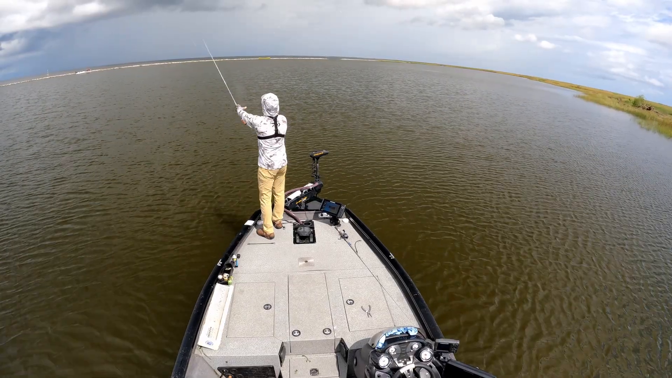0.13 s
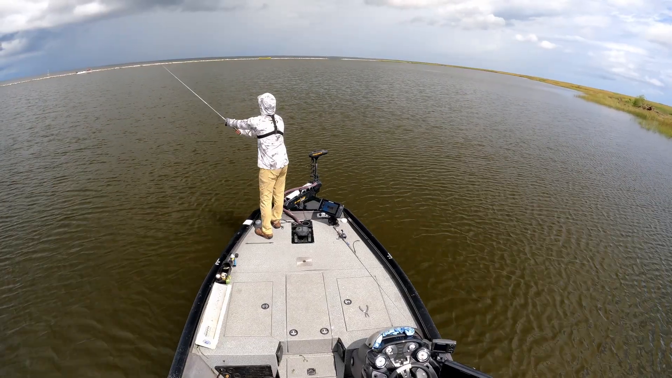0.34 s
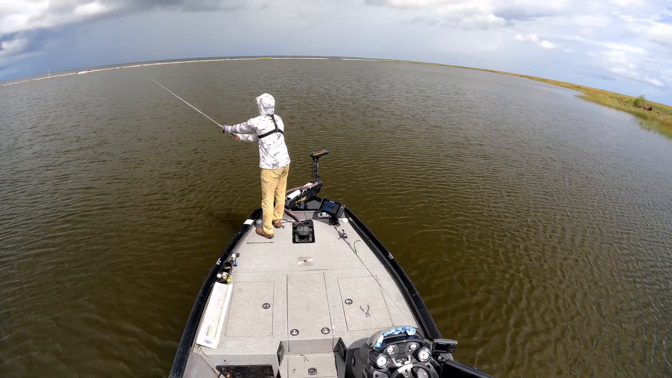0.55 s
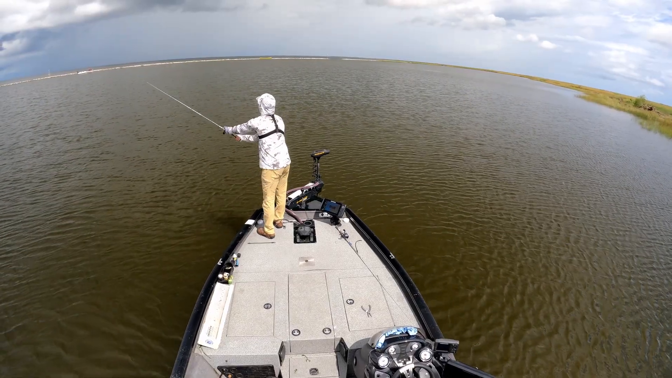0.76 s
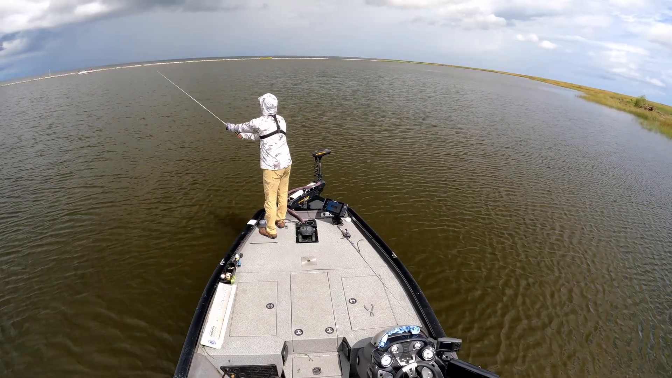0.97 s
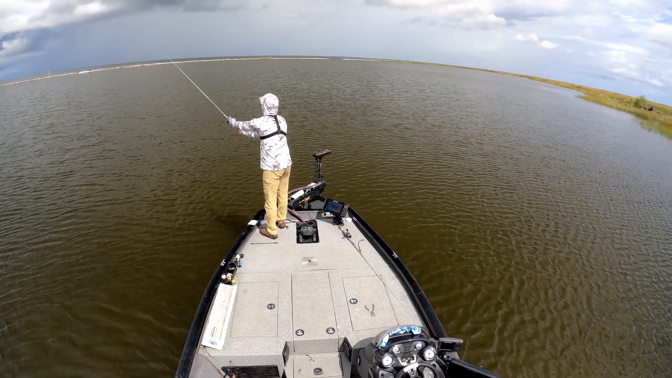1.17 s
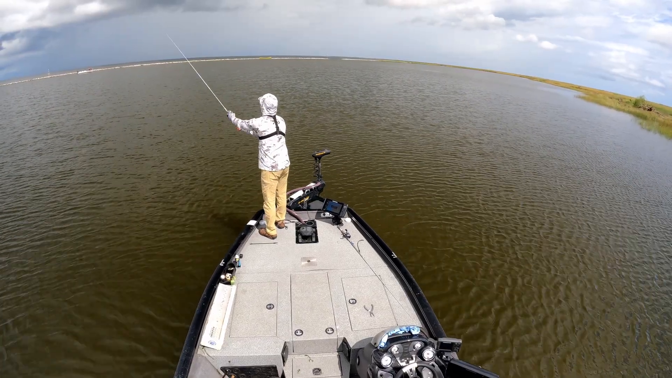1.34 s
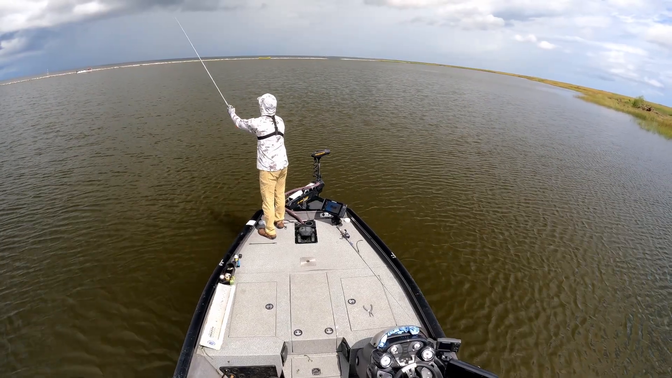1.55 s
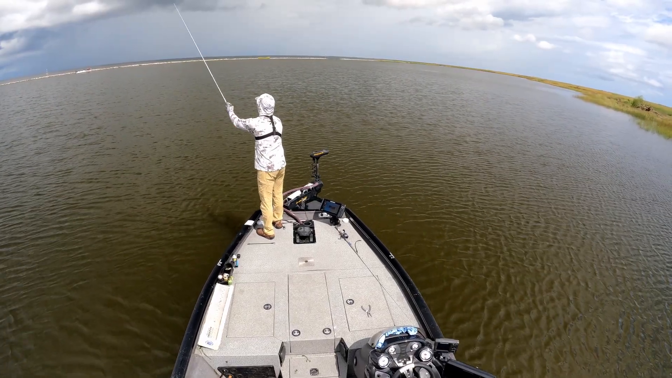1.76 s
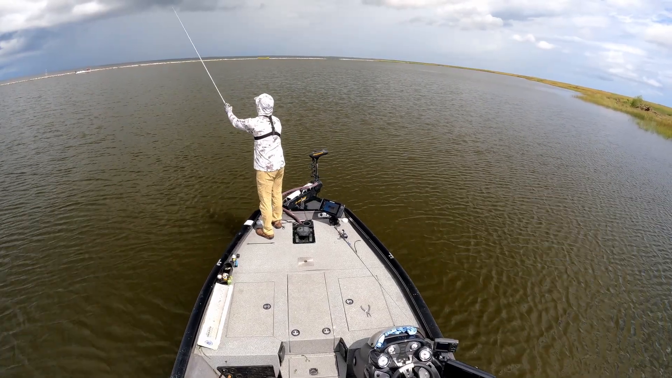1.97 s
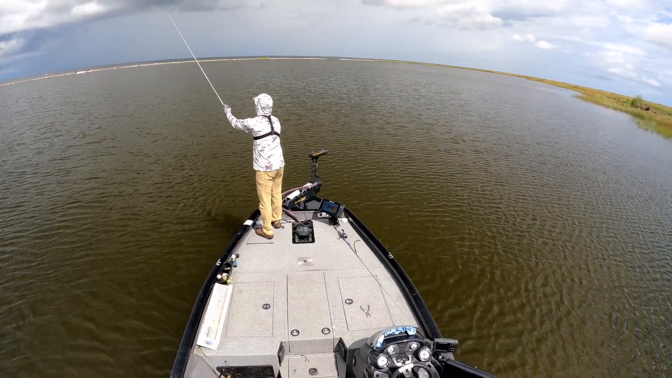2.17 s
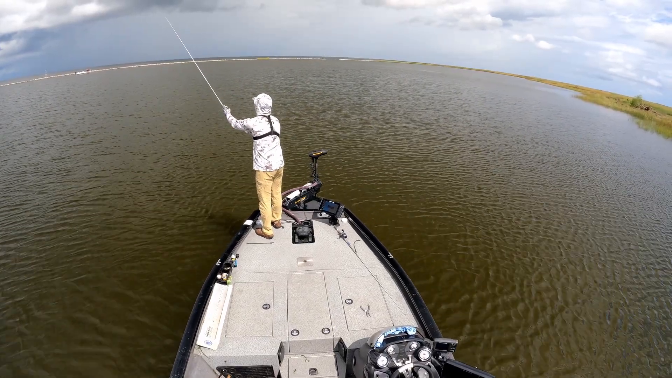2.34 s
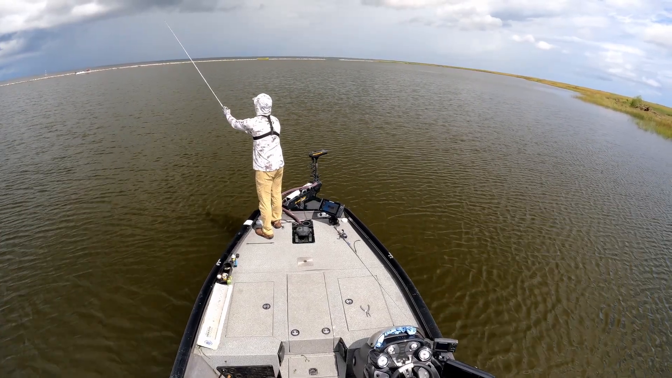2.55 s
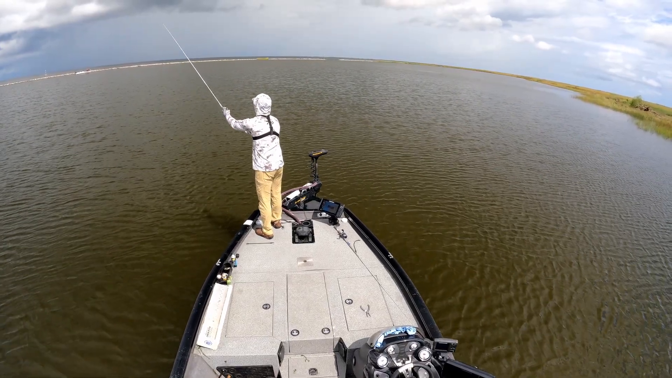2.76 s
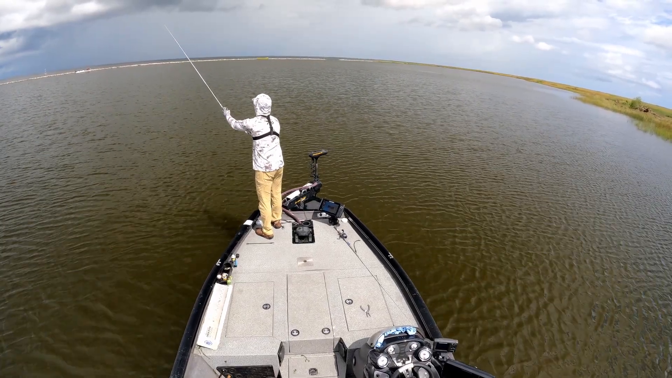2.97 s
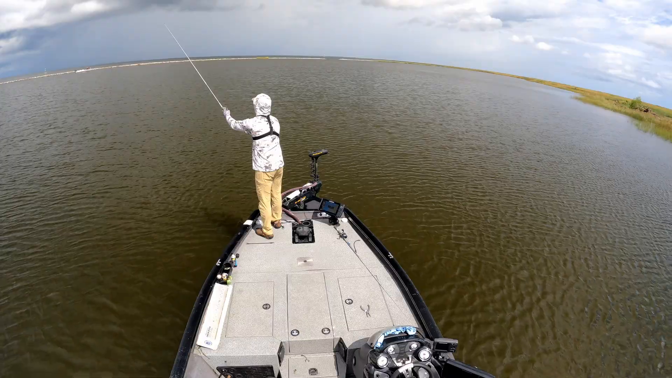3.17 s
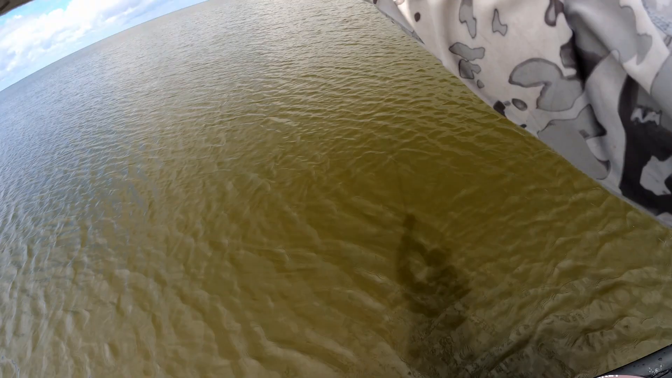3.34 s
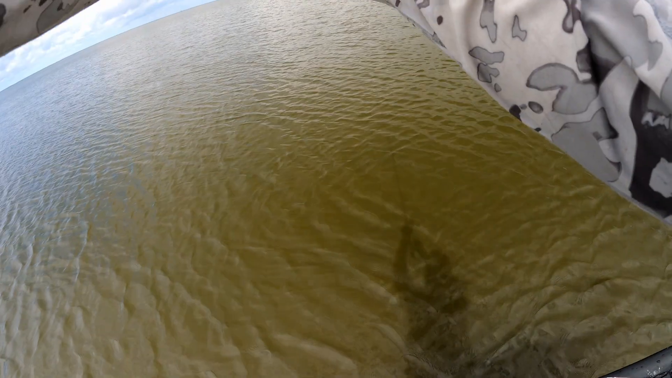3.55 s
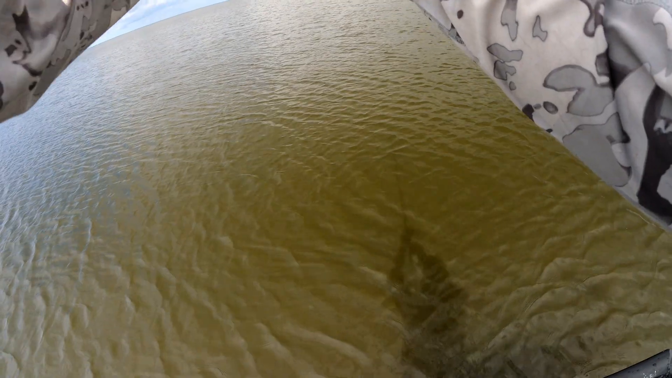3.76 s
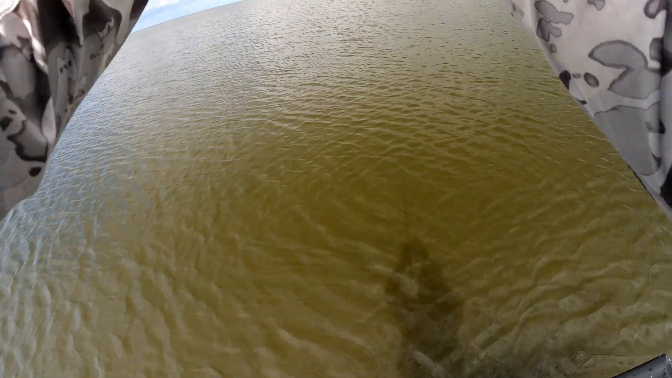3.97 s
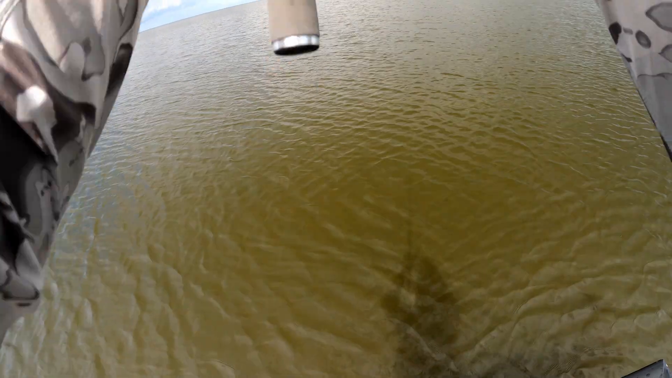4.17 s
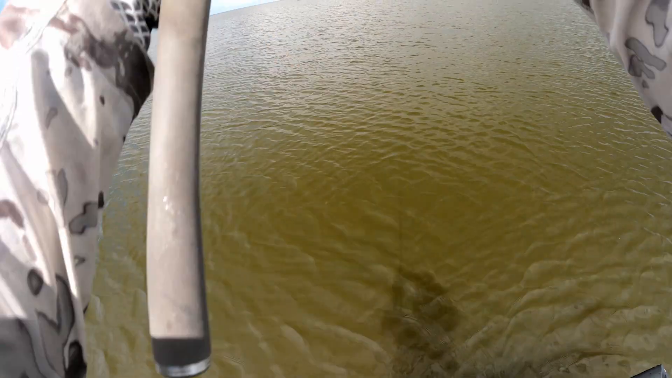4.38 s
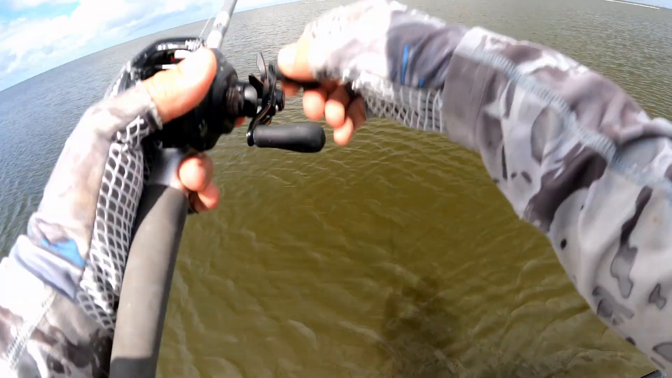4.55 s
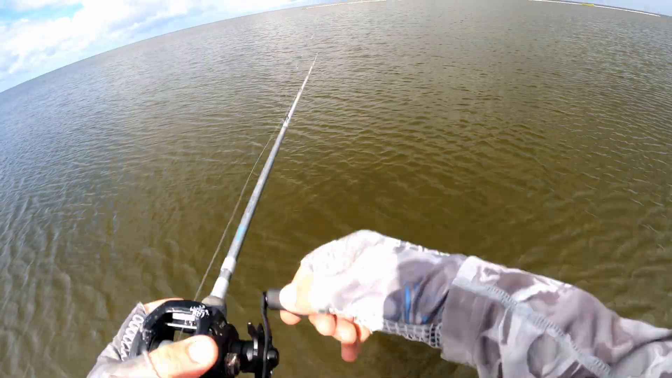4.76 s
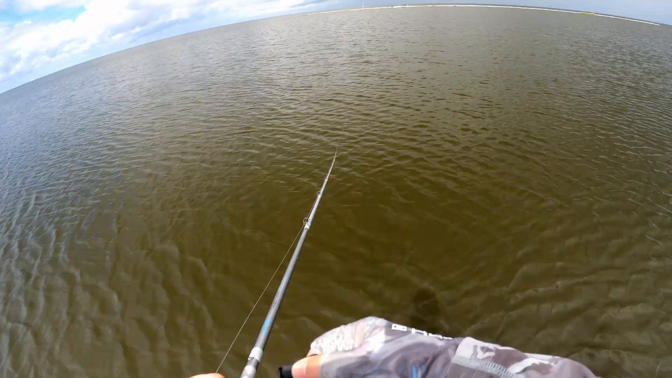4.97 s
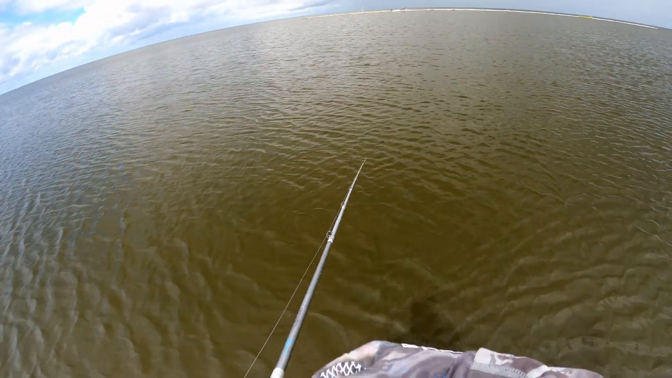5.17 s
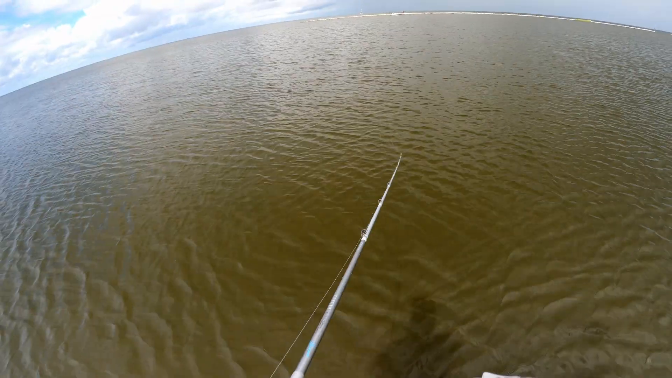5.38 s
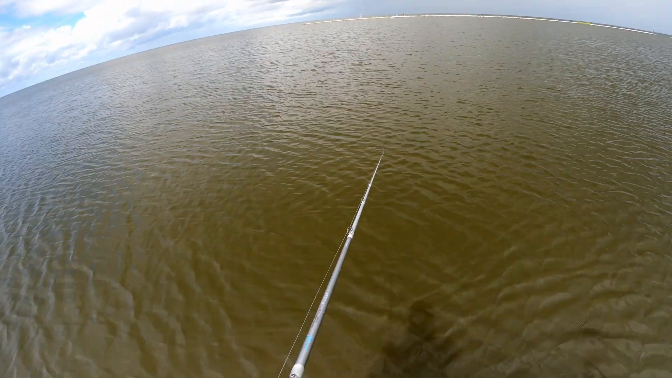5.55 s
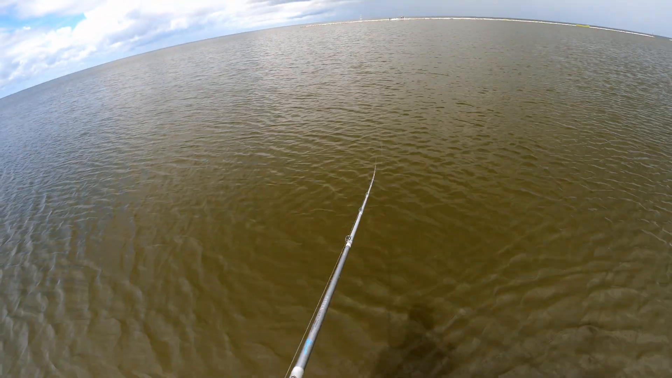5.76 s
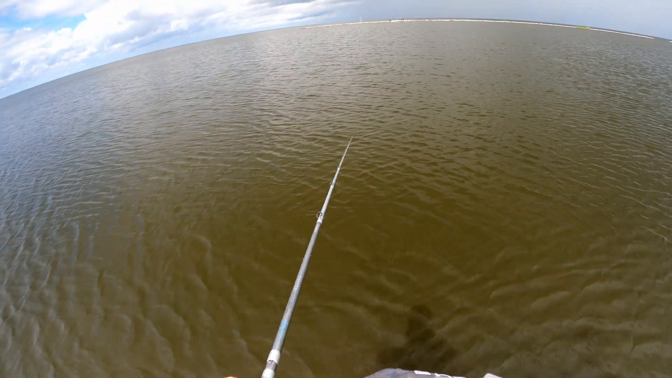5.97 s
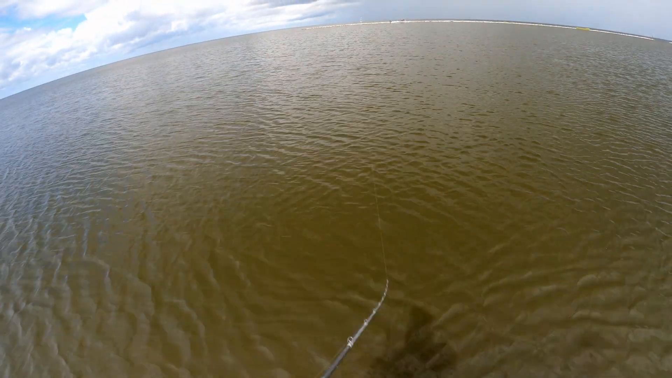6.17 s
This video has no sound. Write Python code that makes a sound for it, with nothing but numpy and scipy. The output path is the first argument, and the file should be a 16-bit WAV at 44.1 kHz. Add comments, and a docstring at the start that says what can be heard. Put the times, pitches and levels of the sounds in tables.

```python
"""A fishing reel's spool spins up on a cast, then whirs down on its bearings as line hisses out.
Heard from the angler's chest in the bow of a boat: the clutch clicks free and the rod swishes through
the air. After the run the thumb creaks on the spool, the clutch snaps in, and a few turns of the handle
make the gears purr and tick. Sleeves rustle, and wind buffets the microphone over lapping water and
the low hum of the boat."""
import sys
import numpy as np
from scipy import signal
from scipy.fft import rfft, irfft, next_fast_len
from scipy.io import wavfile
from scipy.ndimage import uniform_filter1d, map_coordinates

SR = 44100
rng = np.random.default_rng(int(sys.argv[2]) if len(sys.argv) > 2 else 0)


def put_to_file(sound):
    """Save the sound as 16-bit audio at rate SR, in the file named by the first command-line argument."""
    columns = np.atleast_2d(sound).T  # one column per channel
    safe = np.clip(columns, -1, 1)
    whole_steps = np.round(safe * 32767)
    wavfile.write(sys.argv[1], SR, whole_steps.astype(np.int16))


N = 274294
TIME = np.arange(N) / SR


def undb(db):
    """Decibels to gain."""
    return 10 ** (np.asarray(db) / 20)


def unit(x):
    """Scale to rms 1."""
    return x / np.sqrt(np.mean(x ** 2))


def curve(table):
    """An automation line through (seconds, value) points."""
    return np.interp(TIME, *np.transpose(table))


def colour(x, points):
    """EQ by a curve of (Hz, dB) points."""
    hz, db = np.transpose(points)
    size = next_fast_len(len(x))
    bins_hz = np.maximum(np.fft.rfftfreq(size, 1 / SR), 1)
    gain = undb(np.interp(np.log(bins_hz), np.log(hz), db))
    return irfft(rfft(x, size) * gain, size)[:len(x)]


def noise(points):
    """Coloured noise of rms 1."""
    return unit(colour(rng.standard_normal(N), points))


def walk(rate_hz):
    """Smooth random drift of rms 1."""
    knots = rng.standard_normal(N // 10)
    return unit(map_coordinates(knots, [TIME * rate_hz], order=2, mode="wrap"))


def wavering(hz, width_hz, rough):
    """A partial whose size and phase are shaken at about width_hz."""
    phase = 2 * np.pi * np.cumsum(hz) / SR + rng.uniform(0, 2 * np.pi)
    shake = rng.standard_normal((2, N // 20))
    a, b = (np.interp(TIME * width_hz, np.arange(N // 20), row) for row in shake)
    return unit((1 + rough * a) * np.sin(phase) + rough * b * np.cos(phase))


def resonate(x, hz, width_hz):
    """A resonance applied twice, for steep skirts."""
    b, a = signal.iirpeak(hz, hz / width_hz, fs=SR)
    return signal.lfilter(b, a, signal.lfilter(b, a, x))


def grains(rate_hz, spread_db):
    """Sparse random impulses of uneven size."""
    impulses = (rng.random(N) < rate_hz / SR) * rng.standard_normal(N)
    return impulses * undb(spread_db * np.minimum(rng.exponential(size=N), 4))


def swell(s, db, rise_s, fall_s, hold_s=0):
    """Gain that reaches db at time s, holds, and falls; rise and fall are the times for 20 dB."""
    before, after = np.maximum(s - TIME, 0), np.maximum(TIME - s - hold_s, 0)
    return undb(db - 20 * (before / rise_s + after / fall_s))


def swells(table):
    """Joint gain of several swells."""
    return np.sqrt(sum(swell(*row) ** 2 for row in table))


def decay(t, t60):
    """A tail that drops 60 dB in t60 seconds."""
    return np.exp(-np.log(1000) * t / t60)


def add(out, s, x):
    """Mix x into out from time s."""
    i = max(int(s * SR), 0)
    out[i:i + len(x)] += x[:N - i]


# Tone of water and open air. Each row: frequency in Hz, EQ gain in dB.
WATER_EQ = [(30, 1.5), (70, -13), (120, 4), (190, -7), (260, -9.5), (450, -19.5), (800, -17), (1300, -23),
            (2400, -28), (4000, -27.5), (9000, -32), (16000, -30)]


def water():
    """Lapping water and open air make a soft, barely moving bed."""
    return noise(WATER_EQ) * undb(-59 + .55 * walk(4))


# The boat's drone. Each row: pitch in Hz, level in dB.
HUM_PARTIALS = [(85.5, -53.5), (103.5, -58.5), (163.5, -59), (205, -68.5), (287, -79), (327, -69.5)]
# Its two slow swells. Each row: peak time in seconds, gain in dB, rise and fall in seconds.
HUM_RIDES = [(1.8, 0.5, 7.7, 4.2), (4.55, 1, 3.3, 1.6)]


def boat_hum():
    """The boat hums on a few low, slightly unsteady partials."""
    hum = sum(undb(db) * wavering(np.full(N, hz), width_hz=6, rough=.2) for hz, db in HUM_PARTIALS)
    return hum * swells(HUM_RIDES)


# Air thumps as the body swings. Each row: start in seconds, level in dB, rise and fall in seconds.
AIR_THUMPS = [(.07, -7, 0.0014, 0.013), (.28, -13.5, 0.024, 0.045)]


def buffets():
    """Each buffet is one quick push of air that ebbs away."""
    out, t = np.zeros(N), TIME[:SR // 2]
    for s, db, rise_s, fall_s in AIR_THUMPS:
        push = (1 - np.exp(-(t / rise_s) ** 2)) * np.exp(-t / fall_s)
        add(out, s, undb(db) * push / push.max())
    return out


# Rumble of the breeze and of the gusts. Each row: frequency in Hz, EQ gain in dB.
BREEZE_EQ = [(4, -12), (9, 3.5), (16, -13), (28, -20.5), (50, -26), (100, -36), (200, -48), (500, -52.5),
             (2000, -120)]
GUST_EQ = [(4, -16.5), (9, 2.5), (16, -11.5), (28, -28.5), (50, -27), (100, -47), (300, -83), (2000, -130)]
# Air driven by the swing, and slow gusts.
# Each row: peak time in seconds, level in dB, rise and fall in seconds.
SWING_BLASTS = [(.078, -4.5, 0.076, 0.11), (.33, -24, 0.35, 0.32)]
SLOW_GUSTS = [(1.08, -30, .25, 0.39), (1.62, -34, 0.55, 0.37), (2.48, -35.5, 0.66, 0.25),
              (3.24, -31, 0.16, .2), (3.46, -29.5, 0.28, 0.3), (4.53, -29.5, 0.46, 0.52),
              (5.8, -43, 0.99, 1.3)]


def wind(breeze_db=-42.5, ceiling=.6):
    """Moving air pushes on the microphone; the hardest buffets flatten out."""
    breeze, gusts = noise(BREEZE_EQ), noise(GUST_EQ)
    breeze /= np.sqrt(uniform_filter1d(breeze ** 2, SR // 4))  # even out the level
    breeze *= np.hypot(undb(breeze_db), swells(SWING_BLASTS))
    air = breeze + gusts * swells(SLOW_GUSTS) + buffets()
    return ceiling * np.tanh(air / ceiling)


# A low thump on the swing, then a small tap and soft plops, perhaps the lure landing far off.
# Each row: start in seconds, pitch in Hz, level in dB, t60 in seconds.
THUMP_AND_PLOPS = [(.071, 68, -15, 0.1), (3.488, 1195, -34, 0.016), (3.544, 477, -51, 0.073),
                   (3.554, 434, -47, 0.056)]


def thump_and_plops():
    """Each thump, tap or plop is a close cluster of quickly damped tones."""
    out, t = np.zeros(N), TIME[:SR // 8]
    for s, hz, db, t60 in THUMP_AND_PLOPS:
        phase = 2 * np.pi * hz * t
        ring = np.sin(phase) - .27 * np.sin(1.34 * phase) + .64 * np.sin(.88 * phase)
        attack = 1 - np.exp(-t / .0009)
        add(out, s, undb(db) * ring * attack * decay(t, t60))
    return out


# Tone of the cloth. Each row: frequency in Hz, EQ gain in dB.
CLOTH_EQ = [(71, -31), (120, 2), (167, -7), (436, -8), (643, -12), (839, -13), (968, -18), (2240, -18),
            (3110, -24), (7200, -24.5), (16000, -34.5)]
# Rubs as the rod is lowered. Each row: peak time in seconds, level in dB, rise and fall in seconds.
CLOTH_RUBS = [(4.52, -49, 0.51, 0.27), (4.67, -46, 0.24, 0.3)]


def sleeves():
    """Cloth fibres catch and let go, in two rubs and a faint rustle as the angler shifts."""
    shift = swell(3.42, db=-62, rise_s=.12, fall_s=2.6, hold_s=2.1)
    folds = undb(1.4 * walk(45))
    fibres = unit(colour(grains(rate_hz=14000, spread_db=3.5), CLOTH_EQ))
    return fibres * np.hypot(swells(CLOTH_RUBS), shift) * folds


# Tone of the swish. Each row: frequency in Hz, EQ gain in dB.
SWISH_EQ = [(180, -43), (300, -9), (418, -13), (801, -1.5), (1030, -11), (1660, -5), (3030, -7),
            (3640, -13), (4370, -11), (8220, -11), (9710, -18), (14500, -12.5), (16000, -28)]
# Backswing, then forward whip. Each row: peak time in seconds, level in dB, rise and fall in seconds.
ROD_STROKES = [(.09, -40, 0.27, 0.28), (.155, -25, 0.052, 0.074)]


def rod_swish(split_hz=3300, treble_lag_s=.0058):
    """Air tears past the rod while line and sleeve crackle; the treble peaks late, at top tip speed."""
    crackle = unit(colour(grains(rate_hz=5000, spread_db=2.5), SWISH_EQ))
    air = unit(noise(SWISH_EQ) + 1.3 * crackle)
    low = signal.sosfiltfilt(signal.butter(2, split_hz, fs=SR, output="sos"), air)
    gain = swells(ROD_STROKES)
    return low * gain + (air - low) * np.interp(TIME - treble_lag_s, TIME, gain)


# Resonances the thumb shakes. Each row: frequency in Hz, width in Hz, relative level in dB.
CREAK_MODES = [(257, 150, 4), (356, 110, -2.5), (505, 54, -0.5), (753, 48, 4.5), (1090, 80, 0),
               (1602, 70, -7), (2180, 150, -11), (2903, 90, -2.5), (3800, 90, -16.5), (4760, 300, -20.5),
               (7500, 230, -18)]
# Presses on the spool. Each row: peak time in seconds, level in dB, rise and fall in seconds.
CREAK_SWELLS = [(4.026, -46, 0.004, 0.3), (4.2, -41, 0.052, 0.0301)]


def thumb(judder_hz=122, bend=.04, bend_start_s=4.09, bend_length_s=.053):
    """The wound line judders and squeaks under the thumb, a little higher as it tightens."""
    slip_count = np.floor(np.cumsum(judder_hz * (1 + .44 * walk(90))) / SR)
    slips = unit(np.diff(slip_count, prepend=0) * undb(1.1 * walk(81)))
    friction = slips + .39 * rng.standard_normal(N)
    creak = unit(sum(undb(db) * resonate(friction, hz, width) for hz, width, db in CREAK_MODES))
    pitch_ratio = 1 + bend * np.clip((TIME - bend_start_s) / bend_length_s, 0, 1)
    creak = map_coordinates(creak, [np.cumsum(pitch_ratio)], order=3, mode="mirror")
    return creak * swells(CREAK_SWELLS)


# The hand slows and pushes on twice a turn. Each row: time in seconds, gear mesh rate in Hz.
MESH_RATE = [(4.2, 815), (4.87, 768), (4.99, 785), (5.08, 886), (5.18, 791), (5.27, 895), (5.35, 792),
             (5.39, 855), (5.45, 776), (5.495, 925), (5.56, 816), (5.6, 834), (5.7, 750), (5.76, 720),
             (5.81, 850), (5.9, 820)]
# The purr. Each row: multiple of the mesh rate, relative level in dB.
GEAR_PARTIALS = [(1, -1), (2.5, -15), (4, -18.5), (5.4, -23.5)]
# Grit between the teeth. Each row: frequency in Hz, EQ gain in dB.
GRIT_EQ = [(200, -4.5), (700, 9), (1300, -0.5), (2100, -3), (2700, -2.5), (3400, -3), (4500, -15.5),
           (6000, -23), (16000, -27)]


def gears(load_db_per_s=3.5, full_load_s=5.34):
    """Rough, gritty teeth purr at a pitch that follows the hand, louder as the line tightens."""
    hz = curve(MESH_RATE)
    gain = swell(4.065, db=-57, rise_s=.058, fall_s=.26, hold_s=1.74)
    gain *= undb(load_db_per_s * np.minimum(TIME - full_load_s, 0))
    purr = np.zeros(N)
    for k, db in GEAR_PARTIALS:
        partial = wavering(k * hz, width_hz=110 * k, rough=1.3 * k)
        flicker = undb(min(k, 4) * walk(25))
        purr += undb(db) * unit(partial * flicker)
    grit = unit(colour(grains(rate_hz=3500, spread_db=3), GRIT_EQ)) * undb(2.5 * walk(30))
    return (undb(-1) * purr + undb(-5) * grit) * gain


def strike(modes, frame_db, treble_db):
    """One contact in the reel: its modes, a short crack, and the fainter ring of the rod."""
    t = TIME[:SR // 8]
    hz, db, t60 = np.transpose(modes)[:, :, None]
    hz = hz * (1 + .008 * rng.standard_normal(hz.shape))
    gain = undb(db + frame_db * (hz < 1500) + treble_db * (hz > 4000))
    gain *= undb(1.2 * rng.standard_normal(hz.shape))  # no two contacts land on the same spot
    ring = gain * np.sin(2 * np.pi * (hz * t + rng.random(hz.shape)))
    rod_db = -25 - 8 * (hz > 1500)  # the rod takes up mostly the low modes
    fade = decay(t, t60) + undb(rod_db) * decay(t, 6 * t60)
    crack_eq = [(150, frame_db - 16.5), (700, frame_db + 4), (3000, 6.8),
                (8000, treble_db - 6), (15000, treble_db - 6.5)]
    crack = colour(rng.standard_normal(len(t)), crack_eq)
    crack *= 1.34 * np.exp(-t / .001) + .11 * np.exp(-t / .0088)
    attack = 1 - np.exp(-t / .000097)
    hit = ((ring * fade).sum(axis=0) + crack) * attack * undb(-11)
    # so small a body radiates almost no bass
    return signal.sosfilt(signal.butter(3, 470, "highpass", fs=SR, output="sos"), hit)


def knocks(events, modes, chatter_db):
    """Parts of the reel knock home; they chatter lightly just before they seat."""
    out = np.zeros(N)
    for s, db, frame_db, treble_db in events:
        add(out, s, undb(db) * strike(modes, frame_db, treble_db))
        lead_s = rng.uniform(.00077, .0054)
        add(out, s - lead_s, undb(db + chatter_db) * strike(modes, frame_db, treble_db + 6))
    return out


# Handle ticks. Each row: start in seconds, then gain, frame boost and treble boost in dB.
HANDLE_TICKS = [(3.411, -49, -10, 0), (3.488, -45, -8, 3), (3.558, -45, -10, -2), (3.93, -43.5, -8, 5),
                (4.3245, -35.5, 4, 2), (4.327, -29, 2.5, -5), (4.3665, -17, -7, -3),
                (4.3691, -19, -0.5, -6), (4.486, -21, -6.5, -0.5), (4.724, -26, -4, -0.5),
                (4.9785, -29.5, 0.5, -4), (5.1192, -28, -8, 4), (5.1885, -37.5, 9, -4),
                (5.2075, -32.5, 5.5, 8), (5.3045, -28.5, -1.5, -6), (5.333, -24.5, -10, 2),
                (5.413, -31, 8, -7), (5.4385, -23, -7, 0), (5.54, -34, -2, -3), (5.543, -30, -1, -10),
                (5.5706, -21, -5, -4), (5.6528, -29.5, -4, -9), (5.672, -25, 0, -2.5),
                (5.6757, -23.5, -11, -9), (6.123, -39, -9, -8)]
# Ring of handle and shaft. Each row: frequency in Hz, relative level in dB, t60 in seconds.
HANDLE_RING = [(812, 0.5, 0.022), (1220, -3, 0.011), (1620, -3, 0.012), (1995, 1.5, 0.014),
               (2200, -2.5, 0.016), (3170, -9.5, 0.016), (4520, -10, 0.0034), (6000, -15, 0.011),
               (7120, -1, 0.0066), (8330, 6, 0.0022), (10550, 1.5, 0.0014), (11100, -16, 0.0033),
               (13900, -13, 0.015)]


def handle():
    """The handle rattles and takes up its play."""
    return knocks(HANDLE_TICKS, HANDLE_RING, chatter_db=-13)


# Clutch clicks. Each row: start in seconds, then gain, frame boost and treble boost in dB.
CLUTCH_SNAPS = [(.0244, -8, -15.5, -2.5), (.1178, -20.5, -1.5, -12), (.1485, -19, -4, -7),
                (.176, -13, -28, 6.5), (4.1687, -24, -1, 3), (4.1893, 2.5, 1, -3), (4.2092, -5, -4.5, 7.5),
                (4.2525, -33.5, 6, -7), (4.301, -37, 4.5, -3)]
# Ring of clutch and frame. Each row: frequency in Hz, relative level in dB, t60 in seconds.
CLUTCH_RING = [(721, -2.5, 0.014), (830, -4, .035), (973, 7, .009), (1155, -1.5, 0.016), (1333, -2, .013),
               (1980, 1, 0.006), (2530, -6.5, 0.014), (2930, -6, 0.014), (3300, -10, 0.017),
               (4520, -7.5, 0.014), (4900, -10, .011), (5850, -13, 0.0094), (6500, -6.5, 0.0044),
               (7790, -2, 0.0056), (10800, -8, .004), (14250, -7.5, 0.011)]


def clutch():
    """The clutch lets go for the cast, is jolted, and later snaps back in."""
    return knocks(CLUTCH_SNAPS, CLUTCH_RING, chatter_db=-35.5)


# The spring's zing. Each row: pitch in Hz, width in Hz, level in dB, t60 in seconds.
SPRING_RING = [(12500, 150, -37.5, .13), (14150, 700, -14, .028)]


def clutch_spring(snap_s=4.1893):
    """The spring sings, thin and rough, as the clutch seats."""
    return sum(wavering(np.full(N, hz), width, rough=1.2) * swell(snap_s, db, .0005, t60 / 3)
               for hz, width, db, t60 in SPRING_RING)


# Line hiss, early and with the rod raised. Each row: frequency in Hz, EQ gain in dB.
EARLY_LINE_EQ = [(250, 0), (550, -3.5), (850, -1.5), (1150, -4), (1700, -5), (2500, -0.5), (3100, -8.5),
                 (3900, -11), (5400, -9.5), (6300, -10), (7500, -6.5), (9300, -16), (11000, -23),
                 (14000, -16.5)]
RAISED_LINE_EQ = [(250, -3), (520, -11.5), (850, 6.5), (1150, 2.5), (1600, 1), (2500, 2), (3100, -1),
                  (3700, -10), (4800, -8), (6700, -10.5), (7900, -7.5), (8900, -9), (10300, -19.5),
                  (14000, -22)]
# The bounce off the arm lengthens as the rod goes up. Each row: time in seconds, extra path in metres.
ARM_DETOUR = [(.9, 0.11), (1.2, 0.12), (1.5, 0.1274), (2, 0.13), (3, 0.13)]


def line_hiss(spool_hz, raise_s=1, raise_length_s=.76):
    """Line runs through the guides, pulsing once a spool turn and changing colour as the rod lifts."""
    raised = np.clip((TIME - raise_s) / raise_length_s, 0, .93)
    hiss = np.sqrt(1 - raised) * noise(EARLY_LINE_EQ) + np.sqrt(raised) * noise(RAISED_LINE_EQ)
    delay_s = curve(ARM_DETOUR) / 343
    arm_echo = map_coordinates(hiss, [(TIME - delay_s) * SR], order=3, mode="mirror")
    hiss += undb(-9) * raised * arm_echo
    turn = np.sin(2 * np.pi * np.cumsum(spool_hz) / SR)
    hiss *= (1 + .21 * turn) * undb(.5 * walk(18))
    # loose coils brush the guides in brief, high chirps
    brush = unit(resonate(rng.standard_normal(N), hz=14100, width_hz=1700))
    return hiss + brush * undb(-28.5 + 10 * np.minimum(walk(30), 2))


# Partials of the shaft (whole numbers) and the bearing balls.
# Each row: multiple of the spool speed, relative level in dB.
BEARING_PARTIALS = [(2, 0), (2.55, -14), (3, -0.5), (3.5, -1.5), (3.97, -1.5), (4.38, -3.5), (4.55, -2.5),
                    (4.98, -5), (5.45, -5.5), (5.96, -6.5), (6.35, 3), (6.97, -5), (7.33, -2.5), (7.88, -8),
                    (8.33, -3), (8.86, -6), (9.33, -4), (9.75, -4), (10.65, -6), (11.65, 3), (12.4, -8),
                    (12.9, -4), (13.8, -5)]
# The reel's body; a partial swells as it falls through a peak. Each row: frequency in Hz, gain in dB.
REEL_EQ = [(200, -9), (500, -4.5), (700, -1.5), (860, 6.5), (1030, -0.5), (1200, 1.5), (1380, -0.5),
           (1560, 7), (1720, 3.5), (1870, 5.5), (1980, 2.5), (2130, 4), (2280, 2), (2450, 6.5), (2850, -9),
           (3200, -25), (4200, -23), (8000, -57)]


def bearings(spool_hz):
    """The balls skid, so their partials swell, fade and blur; the high ones blur most."""
    whine = np.zeros(N)
    for k, db in BEARING_PARTIALS:
        whine += undb(db + walk(12)) * wavering(k * spool_hz, width_hz=14 + .55 * k ** 2, rough=.85)
    whine = colour(whine, REEL_EQ)
    return whine / np.std(whine[:2 * SR])


# Spool speed while the lure pulls, before it coasts. Each row: time in seconds, turns per second.
SPOOL_SPEED = [(0, 125), (.1, 198), (.175, 354.9), (.215, 399), (.3, 378.5), (.5, 362.6), (.7, 324.8),
               (.85, 293.2)]


def spool(full_speed_hz=360, drag_per_s=.553, taut_s=.204, taut_rise_s=.041, slack_s=3.4):
    """Unbalance hums once a turn under the bearings' whine and the line's hiss; all fade as it slows."""
    coasting_s = np.maximum(TIME - SPOOL_SPEED[-1][0], 0)
    hz = curve(SPOOL_SPEED) * np.exp(-drag_per_s * coasting_s)
    octaves_down = np.log2(full_speed_hz / hz)
    # the line comes taut with a jerk, the lure pulls for a while, and the line runs until slack
    jerk = swell(taut_s, -47, taut_rise_s, fall_s=.1)
    pull = swell(taut_s, 0, taut_rise_s, fall_s=.31, hold_s=.35)
    running = swell(taut_s, 0, taut_rise_s, fall_s=.39, hold_s=slack_s - taut_s)
    tone_gain = running * undb(-49.5 - 20.5 * octaves_down) + pull * undb(-49.5)
    whine_gain = running * undb(-50.5 - 9.5 * octaves_down ** 2) + jerk
    hiss_gain = running * undb(-53 - 6.5 * octaves_down) + pull * undb(-59.5)
    hz *= 1 + .002 * walk(25.03)  # slight pitch flutter
    tone = wavering(hz, width_hz=20, rough=.58) * tone_gain
    whine = bearings(hz) * whine_gain
    hiss = line_hiss(hz) * hiss_gain
    # the shaft presses on its bearing: an octave that follows the jerk and the square of the tone
    octave_gain = tone_gain ** 2 * undb(-2) + jerk * undb(7.5)
    octave = wavering(2 * hz, width_hz=35, rough=.39) * octave_gain
    return tone + octave + whine + hiss


def scene():
    """The reel, the cast and the surroundings, in open air, in mono."""
    reel = spool() + thumb() + gears() + clutch() + handle() + clutch_spring()
    cast = rod_swish() + sleeves() + thump_and_plops()
    surroundings = wind() + boat_hum() + water()
    return (reel + cast + surroundings)[None]


def record(dry, ceiling=.95, top_hz=16000):
    """Soft clipping rounds the loudest peak, and a steep low-pass cuts the top."""
    rounded = ceiling * np.tanh(dry / ceiling)
    return signal.sosfilt(signal.ellip(10, .2, 80, top_hz, fs=SR, output="sos"), rounded)


dry = scene()
out = record(dry)
put_to_file(out)
```